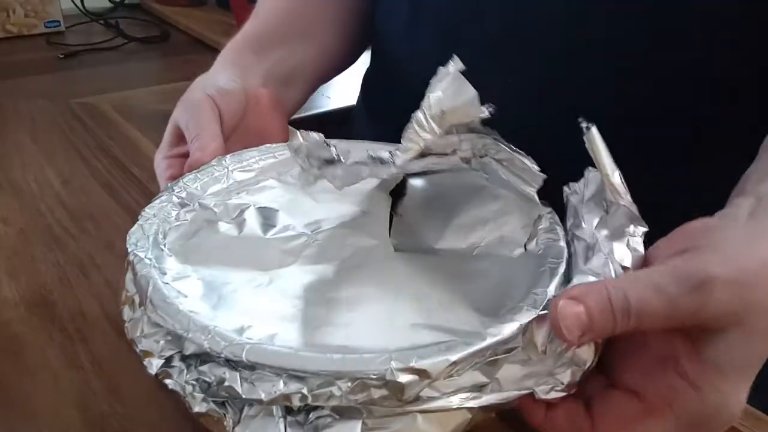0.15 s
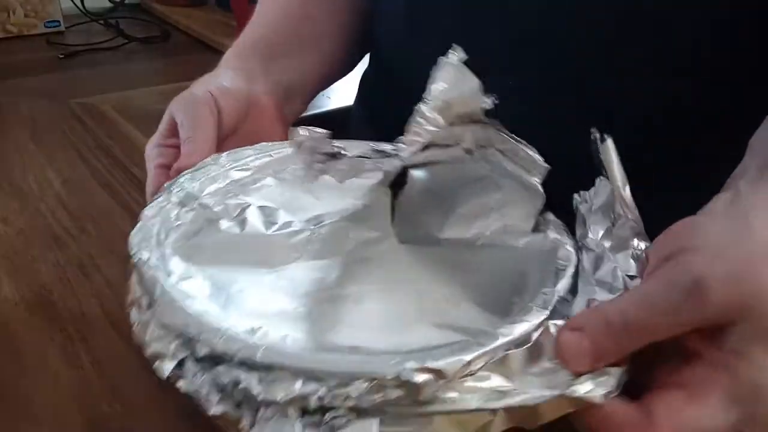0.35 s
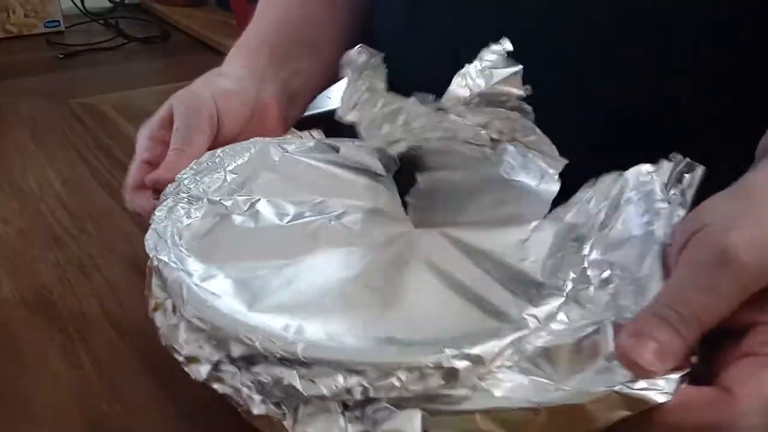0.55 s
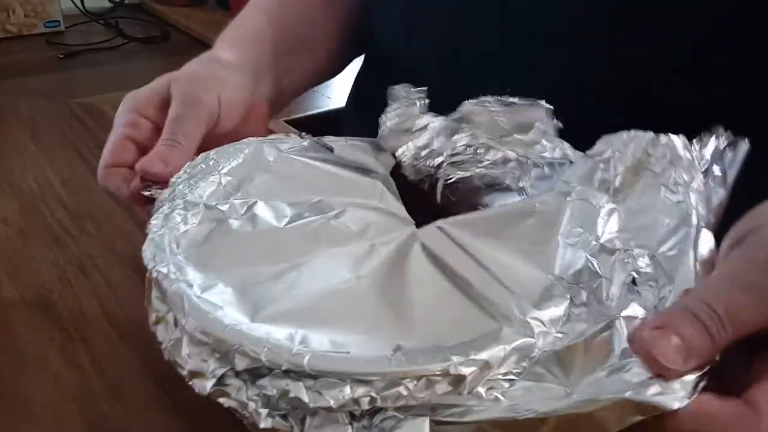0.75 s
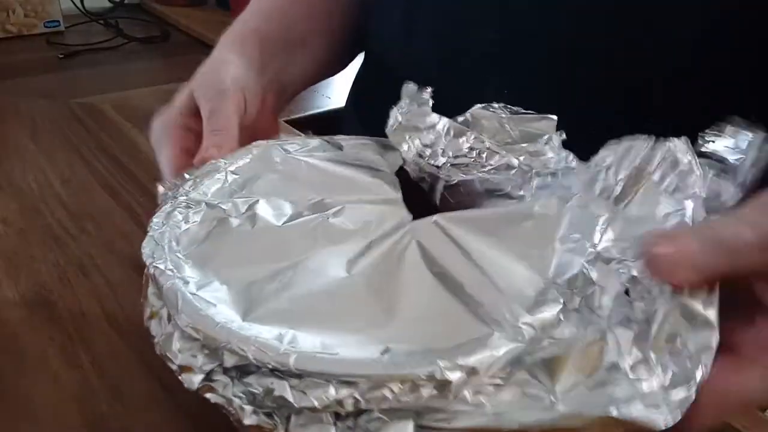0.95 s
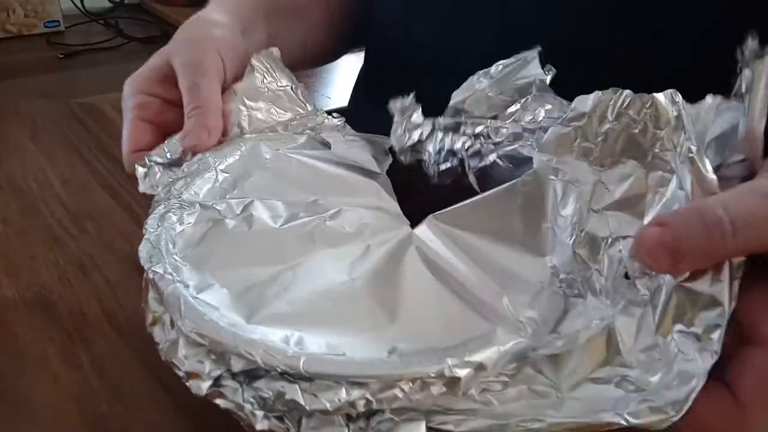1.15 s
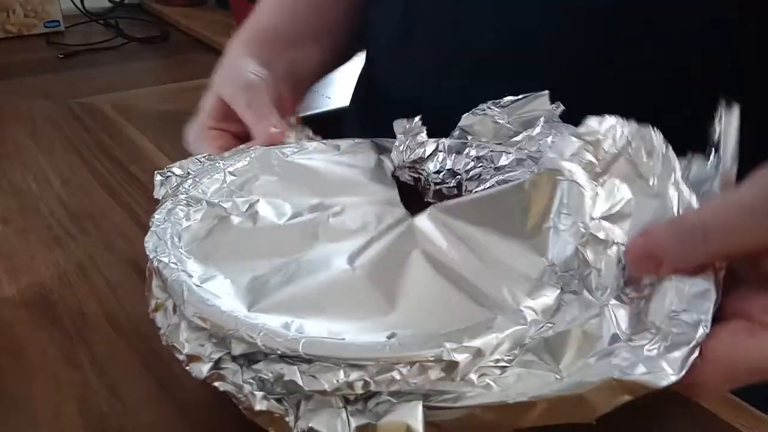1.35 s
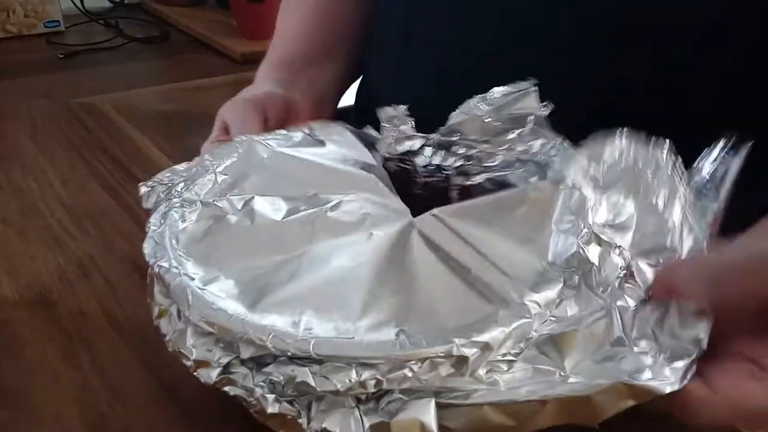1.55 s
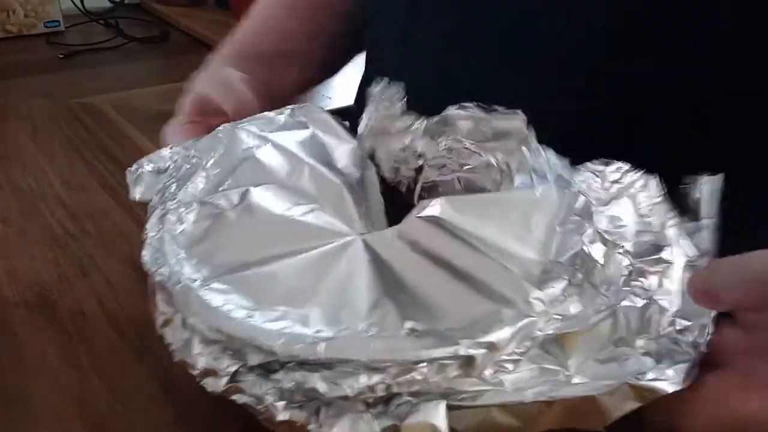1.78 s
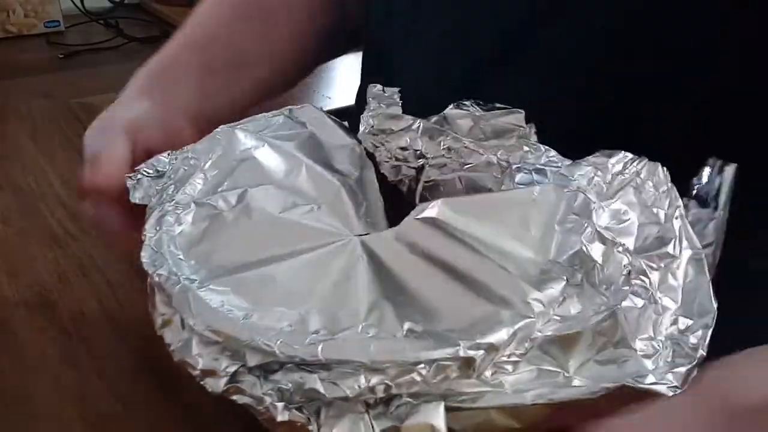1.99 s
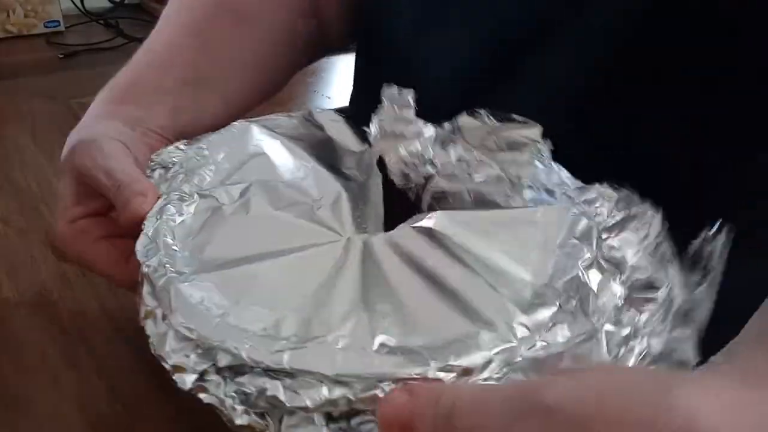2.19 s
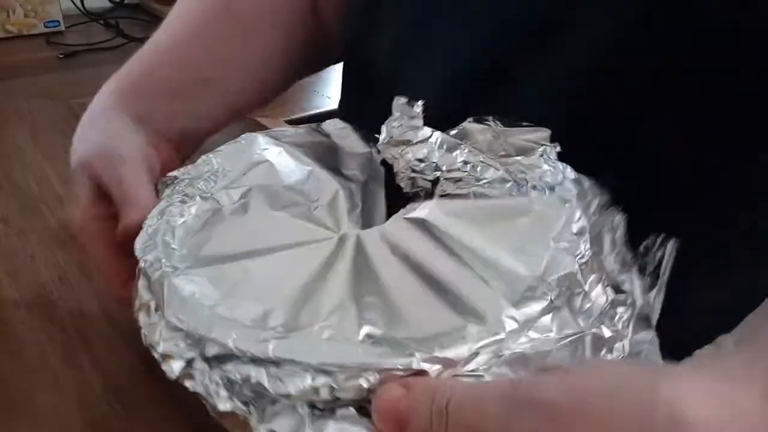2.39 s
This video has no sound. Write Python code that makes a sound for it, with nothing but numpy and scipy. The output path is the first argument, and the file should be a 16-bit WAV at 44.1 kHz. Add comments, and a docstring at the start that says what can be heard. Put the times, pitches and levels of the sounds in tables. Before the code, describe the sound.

Close-miked kitchen foil crinkles in uneven bursts: a quiet start, quick crisp crackles and hard little snaps, a few panel pops, papery metallic rattling and barely audible bowl nudges, with slight room reflections.

```python
"""Close at hand, a dense bright crackle with sharp snaps: foil is peeled off a bowl and crumpled in a small kitchen.
Each tiny crease buckles as a noise burst coloured by its own facet; large creases add a crack, a rasp and a ping.
Wide panels pop as short pulses of rising pitch. The loose sheet rattles lower down and rings when it flexes.
Nudges of the bowl ring a few low modes, and decaying noise gives the room's short tail."""
import sys
import numpy as np
from scipy import signal
from scipy.fft import rfft, irfft, next_fast_len
from scipy.io import wavfile

SR = 44100
rng = np.random.default_rng(int(sys.argv[2]) if len(sys.argv) > 2 else 0)


def master(y):
    """Save y as 16-bit WAV."""
    cut = np.clip(np.atleast_2d(y).T, -1, 1)
    pcm = np.round(cut * 32767)  # scale
    wavfile.write(sys.argv[1], SR, pcm.astype(np.int16))


N = 107074

# How hard the foil is worked. Each row: time in seconds, relative crackle level in dB,
# relative mids in dB, relative treble in dB.
CRUSHING = [(0.063, -68.5, 1.5, 0.5), (0.134, -65.5, 0, 0), (0.141, -54, 0, -5), (0.185, -55.5, 1, -1),
            (0.22, -45, -4, -4), (0.29, -34, -8.5, -3), (0.335, -34, 2, 0), (0.425, -36, -5.5, -2),
            (0.445, -26.5, -5, -1), (0.49, -26, -4.5, 2.5), (0.55, -33, -6.5, -4), (0.63, -39.5, -4, -4),
            (0.672, -23, -9, -1.5), (0.71, -44, 2.5, -12), (0.745, -36, 1.5, -1), (0.769, -33.5, -1.5, 4),
            (0.821, -34, -5.5, -7.5), (0.863, -48, 1, -5), (0.879, -25, -8, -0.5), (0.913, -35, -4, -6.5),
            (0.941, -26.5, -5.5, 0), (1.07, -28.5, -7, -5), (1.165, -49, 4, -1), (1.208, -26, -7.5, -1),
            (1.27, -28.5, -4, -1), (1.315, -41, -0.5, 0), (1.35, -42, -2, -2), (1.405, -28, -8, -4),
            (1.425, -26.5, -6, 0), (1.53, -30.5, -9, -5.5), (1.59, -28.5, -4, 3), (1.66, -31, -8.5, -3),
            (1.754, -29.5, 1, -0.5), (1.79, -31, -7, -11), (1.815, -25.5, -2.5, -5.5),
            (1.86, -43.5, -5, -9), (1.925, -46, -6.5, -5), (1.967, -58, 6, -6), (1.972, -41, -3.5, 4),
            (2.0, -42.5, 3, 2), (2.015, -49, 2, -5), (2.034, -45, -2, -1), (2.085, -24.5, -5, -2.5),
            (2.11, -47, 0, -3), (2.15, -33, -4.5, 4.5), (2.175, -36, -8.5, -8), (2.201, -30, 0, 0),
            (2.29, -40.5, -3.5, -1), (2.345, -42.5, 5.5, 6), (2.365, -32.5, -7, -7), (2.42, -33, 1.5, -3)]
# Basic colour of the foil. Each row: frequency in Hz, relative gain in dB.
FOIL_COLOUR = [(60, -50), (250, -13.5), (600, -5.5), (1000, 2.5), (2000, 2.5), (3200, 3.5), (4600, 2.2),
               (7200, 1), (8600, -5), (12000, -5), (15700, -3.5)]
FACET_LOW_HZ, FACET_HIGH_HZ = 1230, 8970


def crackle(count, level_db, scatter_db, decay_ms, ring_db, q, mids_db, treble_db):
    """Buckling: many creases of random size and pitch give way, their level and colour following the hands."""
    when, size, pitch, length = rng.random((count, 4)).T
    times = (np.arange(count) + 2 * when) / count * N / SR
    s, *columns = np.array(CRUSHING).T
    db, mids, treble = (np.interp(times, s, column) for column in columns)
    fade_in = np.minimum(times / s[0], 1) ** 4
    scatter = unit(undb(scatter_db * size ** 2)) * np.sqrt(N)
    sizes = scatter * undb(db + level_db) * fade_in
    facet_hz = FACET_LOW_HZ * (FACET_HIGH_HZ / FACET_LOW_HZ) ** pitch
    decays_ms = decay_ms * (.5 + length)
    ticks = creases(decays_ms, facet_hz, mids + mids_db, treble + treble_db,
                    FOIL_COLOUR, ring_db, q, rise_s=.00005)
    return place(times, ticks * sizes[:, None])


# Large creases snapping through. Each row: time in seconds, relative level in dB,
# facet pitch in Hz, relative mids in dB, relative treble in dB, decay constant of the rasp in ms.
LARGE_CREASES = [(0.1394, -38, 1740, -15, -18, 3), (0.1973, -30.5, 2080, -21, 6, 2),
                 (0.2483, -23, 8050, -30, -19, 1.6), (0.2619, -12.5, 4900, -26, -18.5, 1.2),
                 (0.3037, -15, 2150, -15, -25, 1.6), (0.3126, -13.5, 4340, -21, -22, 0.76),
                 (0.3345, -9, 3320, -21, -32, 3.9), (0.3399, -13.5, 3060, -25, -43, 3.2),
                 (0.383, -10.5, 6600, -17, -10, 2.3), (0.3903, -10, 4820, -20, -17, 1.1),
                 (0.431, -12, 7200, -12, -9, 2), (0.444, -12, 2880, -15, -25, 1.8),
                 (0.4713, -12.5, 5150, -25, -17, 1.8), (0.5088, -10.5, 3240, -40, -12, 2.5),
                 (0.546, -19, 4800, -27, -12, 2), (0.568, -10.5, 5170, -22, -14.5, 3.1),
                 (0.5719, -17, 4670, -2, -16, 1.6), (0.599, -15.5, 4540, -9, -15, 1.3),
                 (0.6396, -8, 1930, -25.5, -18.5, 1.9), (0.6695, -16, 6350, -13, -34, 1.8),
                 (0.7166, -13, 7500, -17, -20, 1.2), (0.874, -19, 5400, -9, -17, 3.5),
                 (0.966, -12, 2040, 0, -29, 3.2), (1.014, -13, 3200, -34, -10, 1.2),
                 (1.06, -12, 5400, -17, -31, 1.6), (1.0742, -19, 2980, 18, -33, 1.2),
                 (1.1167, -16, 4350, -29, -26.5, 1.8), (1.124, -11.5, 6800, -21, -30, 1.3),
                 (1.1736, -13, 5020, -16.5, -20, 1.7), (1.1842, -17, 4340, -18, -23, 2.1),
                 (1.2612, -14, 5130, -24, -27, 2.2), (1.2749, -18.5, 2090, 17, -4, 1.6),
                 (1.3282, -13.5, 5100, -52, -21, 2.5), (1.362, -15, 4700, -15, -19, 2),
                 (1.4295, -11.5, 2220, -24, -23, 1.7), (1.46, -10.5, 3610, -13, -11, 1.6),
                 (1.489, -16, 2640, -24, -27, 1.6), (1.506, -10, 5260, -15.5, -15, 4),
                 (1.5429, -15.5, 6840, -3, -8, 1.2), (1.552, -12.5, 7060, -20, -6, 3.5),
                 (1.6187, -14, 6650, -25, -12, 4), (1.6783, -10, 5000, -16, -11, 0.42),
                 (1.7977, -13.5, 2000, -10, -23, 2.4), (1.8049, -13.5, 3900, -12, -22, 1.8),
                 (1.9817, -28, 5200, -23, -20, 2), (2.0874, -16.5, 5950, -19, -22, 1.6),
                 (2.1171, -13, 5570, -33, -21, 1.8), (2.149, -16.5, 6600, -24, -24, 1.8),
                 (2.1826, -16, 2980, -20, -11, 1.6), (2.2382, -22.5, 4200, -15, -16, 1.6),
                 (2.3027, -13.5, 4440, -15, -15, 1.3), (2.3055, -10, 5900, -14, -22.5, 2.2),
                 (2.3575, -14.5, 2650, -9, -19, 0.7), (2.3647, -17, 1250, -20, -21, 1.6),
                 (2.4204, -12, 5870, -22, -16, 1.6)]
# Basic colour of a snap. Each row: frequency in Hz, relative gain in dB.
SNAP_COLOUR = [(60, -31), (250, -14), (700, -10), (1500, -2), (4500, 2), (8000, -2.5), (15700, -2)]
SNAP_DB, SNAP_MIDS_DB, SNAP_TREBLE_DB = 13, 19.5, 20.5  # added to the table's columns
SNAP_RISE_S, SNAP_LAG_S = .0002, .0006  # the lag is a short delay from the listed time to the start
CRACK_DB, CRACK_SHARE = -6, .16  # first instant of a snap: level, and decay as a share of the rasp's
FACET_RING_DB, FACET_RING_S = -10, 0.0032  # the clean ping of a large facet: level, decay constant


def snaps():
    """Snap-through instability: a hard crack, a short rasp and a brief ping at the pitch of the facet."""
    s, db, hz, mids, treble, decay_ms = np.array(LARGE_CREASES).T

    def bursts(decays_ms, rise_s):
        return unit(creases(decays_ms, hz, mids + SNAP_MIDS_DB, treble + SNAP_TREBLE_DB,
                            SNAP_COLOUR, ring_db=4, q=4.4, rise_s=rise_s))

    rasps = bursts(decay_ms, SNAP_RISE_S)
    cracks = bursts(decay_ms * CRACK_SHARE, SNAP_RISE_S / 10)
    t = np.arange(rasps.shape[1]) / SR
    ring_fall = np.exp(-t / FACET_RING_S)
    cracks = unit(cracks * ring_fall)
    pings = unit(np.sin(2 * np.pi * hz[:, None] * t) * ring_fall * (1 - np.exp(-t / SNAP_RISE_S)))
    sounds = rasps + undb(CRACK_DB) * cracks + undb(FACET_RING_DB) * pings
    return place(s + SNAP_LAG_S, unit(sounds) * undb(db + SNAP_DB)[:, None])


MIDS_HZ, TREBLE_HZ = 2950, 7540  # the mids shelf acts below the first, the treble shelf above the second
SHIMMER_DB, SHIMMER_S = -2, .0045  # each tick spreading through the sheet and off the bowl


def creases(decay_ms, facet_hz, mids_db, treble_db, base, ring_db, q, rise_s, size=768):
    """Impulsive excitation of a resonator: a sudden burst and a shimmer, coloured by the facet's resonance."""
    t = np.arange(size) / SR
    f = np.fft.rfftfreq(size, 1 / SR) + 1
    fall = np.exp(-1000 * t / np.maximum(decay_ms, .1)[:, None])
    shimmer = undb(SHIMMER_DB) * np.exp(-t / SHIMMER_S)
    envelope = np.hypot(fall, shimmer) * (1 - np.exp(-t / rise_s))
    burst = rng.standard_normal((len(decay_ms), size)) * envelope
    ring = 1 + undb(ring_db) / (1 + 1j * q * (f / facet_hz[:, None] - facet_hz[:, None] / f))
    ringing = unit(irfft(rfft(burst) * ring))
    mids_shelf = mids_db[:, None] / (1 + (f / MIDS_HZ) ** 4)
    treble_shelf = treble_db[:, None] / (1 + (TREBLE_HZ / f) ** 12)
    # Folding the cepstrum makes the colour minimum-phase, so each onset stays sharp.
    cepstrum = irfft(np.log(colour(base, f) * undb(mids_shelf + treble_shelf)))
    cepstrum[:, 1:size // 2] *= 2
    cepstrum[:, size // 2 + 1:] = 0
    return irfft(rfft(ringing) * np.exp(rfft(cepstrum)))


# Wide panels flipping over. Each row: start in seconds, relative level in dB, starting pitch in Hz.
PANEL_FLIPS = [(.9672, -5, 1480), (1.7475, -12, 1250), (1.762, -15, 1320), (1.8218, -23, 1750)]
POP_DECAY_S, POP_GLIDE_PER_S = 0.00044, 350  # the panel tightens as it flips
POP_CUT_HZ = 790  # keeps the pops short and light in bass


def pops():
    """Bistable buckling: each wide panel flips at once, a hard, fast-decaying pulse of rising pitch."""
    t = np.arange(SR // 50) / SR
    s, db, hz = np.array(PANEL_FLIPS).T
    cycles = hz[:, None] * t * (1 + POP_GLIDE_PER_S * t / 2)
    pulses = np.sin(2 * np.pi * cycles) * np.exp(-t / POP_DECAY_S)
    bass_cut = signal.butter(2, POP_CUT_HZ, "high", fs=SR, output="sos")
    return place(s, undb(db)[:, None] * signal.sosfilt(bass_cut, pulses))


# Low rattle of the loose sheet. Each row: time in seconds, relative level in dB.
SHEET_LEVEL = [(0.045, -79), (0.07, -78), (0.22, -60), (0.31, -41.5), (0.41, -51), (0.48, -36.5),
               (0.61, -50.5), (0.68, -44.5), (0.77, -44.5), (0.85, -46), (0.98, -38.5), (1.17, -48.5),
               (1.22, -40), (1.35, -46), (1.43, -43.5), (1.54, -44.5), (1.6, -37), (1.66, -40.5),
               (1.82, -45), (1.95, -54), (2.08, -44), (2.16, -49), (2.21, -43), (2.3, -51.5), (2.42, -44.5)]
# Colour of the rattle. Each row: frequency in Hz, relative gain in dB.
RATTLE_COLOUR = [(30, -62), (65, -59), (120, -18.5), (190, -16.5), (290, -5), (560, -0.5), (712, 6),
                 (860, -2), (1500, -1.5), (4000, -91)]
PANEL_LOW_HZ, PANEL_HIGH_HZ, PANEL_RING_S = 260, 987, 0.0085  # pitch range, decay constant


def rattle(count, level_db, scatter_db, ring_db, size=2048):
    """Impact-excited vibration: panels of the loose sheet tap and flap, each at its own low pitch."""
    when, force, sign, pitch = rng.random((count, 4)).T
    times = (np.arange(count) + when) / count * N / SR
    t = np.arange(size) / SR
    hz = PANEL_LOW_HZ * (PANEL_HIGH_HZ / PANEL_LOW_HZ) ** pitch
    rings = unit(np.sin(2 * np.pi * hz[:, None] * t) * np.exp(-t / PANEL_RING_S))
    tap = (t == 0) + undb(ring_db) * rings
    strength = undb(scatter_db * force) * np.sign(sign - .5)
    taps = place(times, tap * strength[:, None])
    s, db = np.array(SHEET_LEVEL).T
    level = undb(level_db + np.interp(np.arange(N) / SR, s, db))
    return unit(tint(taps, RATTLE_COLOUR)) * np.sqrt(N) * level


# The open sheet flexing over the bowl. Each row: start in seconds, relative level in dB, pitch ratio.
SHEET_FLEXES = [(.7175, -22.5, 1), (.742, -26.5, 0.9), (.757, -26, 0.96), (.771, -27.5, 1.08),
                (.99, -35, 0.9), (1.206, -27.5, 0.99), (1.431, -23.5, 1.12), (1.587, -35.5, .65),
                (1.806, -26.5, 1.48), (1.857, -33.5, 1.11)]
# What the sheet rings with. Each row: nominal frequency in Hz, relative level in dB, T60 in seconds.
SHEET_RINGS = [(382, -20, 0.078), (494, -12.5, 0.042), (598, 2, 0.027), (644, 2.5, 0.036), (716, -5.5, .05),
               (790, -27, 0.044), (1000, -3, 0.022)]


def flexes():
    """Modal vibration of a thin sheet: each flex rings its short, closely spaced modes."""
    return knocks(SHEET_FLEXES, SHEET_RINGS, attack_s=0.0017, detune=0.02)


# Soft nudges of the bowl. Each row: start in seconds, relative level in dB, pitch ratio.
BOWL_NUDGES = [(.368, -36, 1.0), (.668, -44, 1.0), (1.805, -41.5, 0.97), (2.033, -45, 0.99)]
# What the bowl thuds with. Each row: nominal frequency in Hz, relative level in dB, T60 in seconds.
BOWL_THUDS = [(85, -47, 0.068), (139, -11.5, 0.094), (260, -13.5, 0.019), (280, 10.5, 0.038)]


def nudges():
    """Modal vibration of a shell: each soft push sounds the low modes of the bowl as a thud."""
    return knocks(BOWL_NUDGES, BOWL_THUDS, attack_s=0.0016, detune=0.005)


def knocks(events, modes, attack_s, detune):
    """Modal superposition: soft pushes sum damped sines, tuned a little differently each time."""
    t = np.arange(SR // 3) / SR
    s, db, ratio = np.array(events).T
    hz, weight_db, t60 = np.array(modes).T
    bent_hz = hz * ratio[:, None] * (1 + detune * rng.standard_normal((len(s), len(hz))))
    decay = np.exp(-np.log(1000) * t / t60[:, None])
    rings = np.sin(2 * np.pi * bent_hz[..., None] * t) * undb(weight_db)[:, None] * decay
    attack = (1 - np.exp(-t / attack_s)) ** 2
    return place(s, rings.sum(1) * attack * undb(db)[:, None])


ROOM_DB, ROOM_T60_S, ROOM_T60_HIGH_S = -7, 0.31, 0.035


def kitchen(x):
    """Diffuse reverberation: a noise tail, drawn anew for each place that sounds, loses its treble first."""
    t = np.arange(N) / SR
    noise = rng.standard_normal(N)
    low = tint(noise, [(3000, -5.5), (6500, -8), (9500, -6), (16000, -11.5)])  # (Hz, dB)
    slow = low * undb(-60 * t / ROOM_T60_S)
    fast = undb(1.5) * (noise - low) * undb(-60 * t / ROOM_T60_HIGH_S)
    tail = (slow + fast) * (t > .004)
    return x + signal.fftconvolve(x, undb(ROOM_DB) * unit(tail))[:N]


def undb(db):
    """Logarithmic level: decibels to amplitude gain."""
    return 10 ** (np.asarray(db) / 20)


def unit(x):
    """Energy normalisation: scale each row to unit energy."""
    return x / np.sqrt(np.sum(x ** 2, axis=-1, keepdims=True) + 1e-18)


def colour(points, f):
    """Spectral envelope: gain at frequencies f of a (Hz, dB) curve, interpolated on a log axis."""
    hz, db = np.array(points).T
    return undb(np.interp(np.log(f + 1), np.log(hz), db))


def tint(x, points):
    """Linear filtering: multiply the spectrum of a sound by a (Hz, dB) curve."""
    size = next_fast_len(N + SR // 10)
    return irfft(rfft(x, size) * colour(points, np.fft.rfftfreq(size, 1 / SR)), size)[:N]


def place(times, sounds):
    """Superposition: sum short sounds at their start times in seconds."""
    at = (np.asarray(times)[:, None] * SR).astype(int) + np.arange(sounds.shape[1])
    return np.bincount(np.maximum(at, 0).ravel(), sounds.ravel(), N)[:N]


def scene():
    """Superposition of sources: two hands, coarse creases with the bowl, and snaps with the loose sheet."""
    hands = [crackle(count=750, level_db=-1.5, scatter_db=11, decay_ms=0.22, ring_db=-1.5, q=4.8,
                     mids_db=1.5, treble_db=1) for _ in range(2)]
    coarse = crackle(count=220, level_db=-4.0, scatter_db=3.5, decay_ms=0.26, ring_db=6, q=4.9,
                     mids_db=2.5, treble_db=7.5)
    sheet = rattle(count=480, level_db=1.0, scatter_db=13, ring_db=-12) + flexes()
    places = hands + [coarse + nudges(), snaps() + pops() + sheet]
    return sum(kitchen(part) for part in places)[None]


TOP_HZ = 15740


def record(dry):
    """Band limitation: an elliptic low-pass cuts the top steeply."""
    return signal.sosfilt(signal.ellip(12, .2, 70, TOP_HZ, fs=SR, output="sos"), dry)


dry = scene()
out = record(dry)
master(out)
```